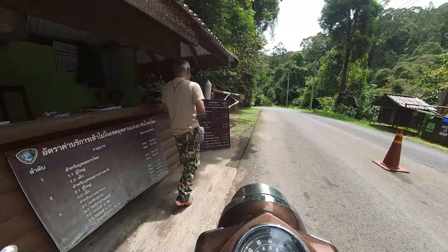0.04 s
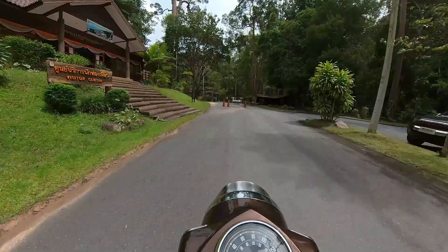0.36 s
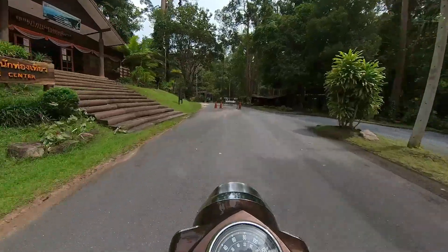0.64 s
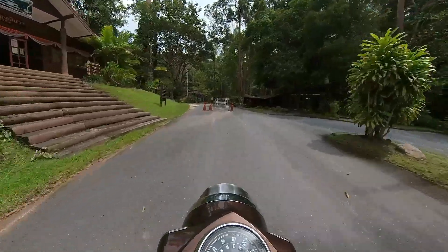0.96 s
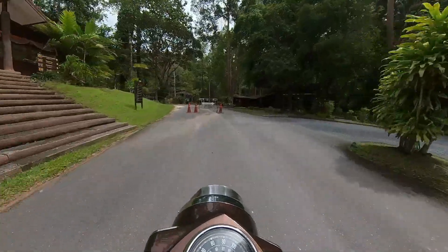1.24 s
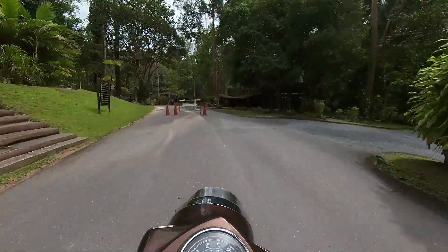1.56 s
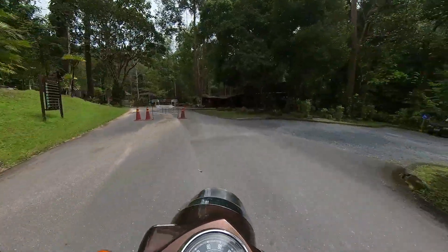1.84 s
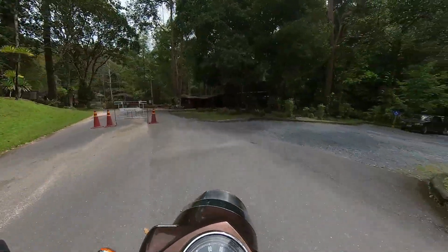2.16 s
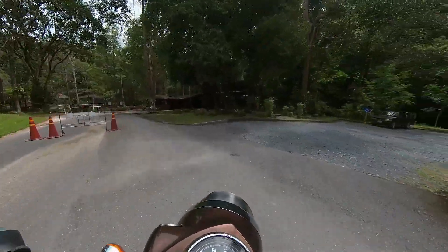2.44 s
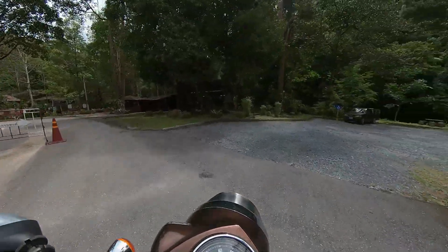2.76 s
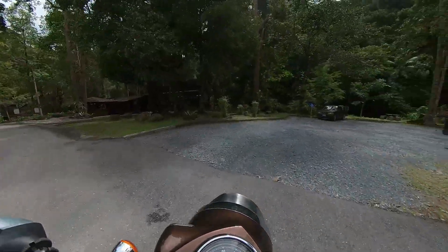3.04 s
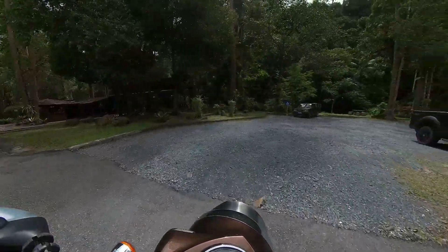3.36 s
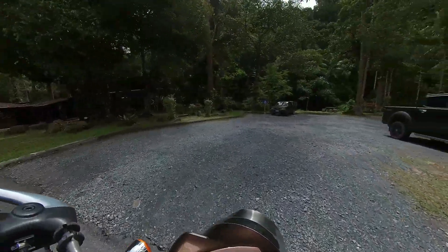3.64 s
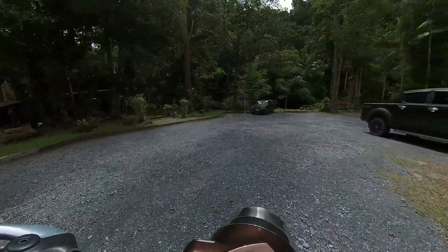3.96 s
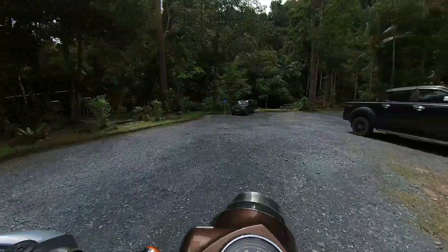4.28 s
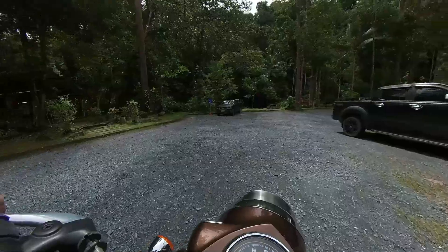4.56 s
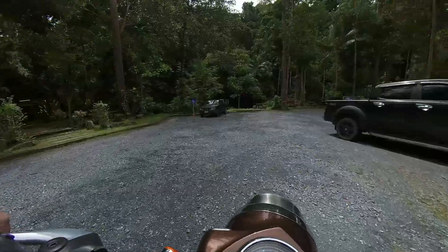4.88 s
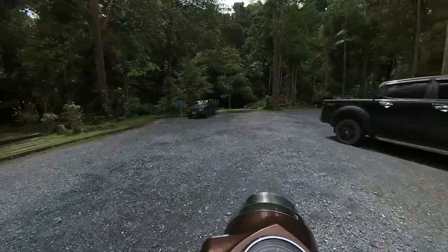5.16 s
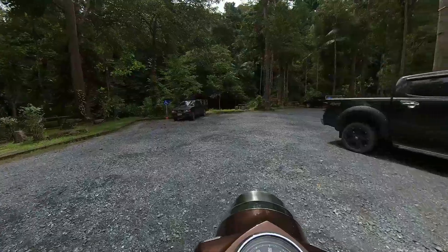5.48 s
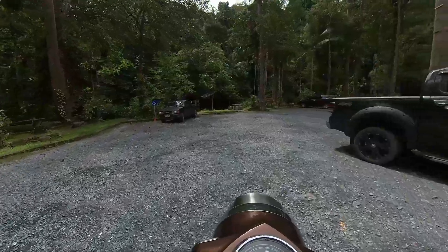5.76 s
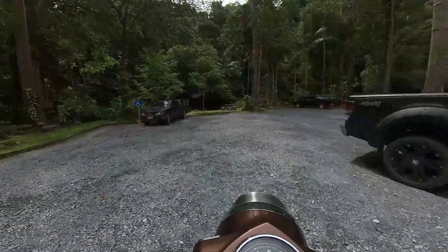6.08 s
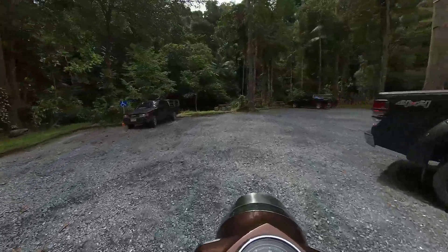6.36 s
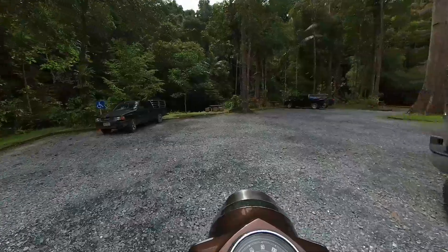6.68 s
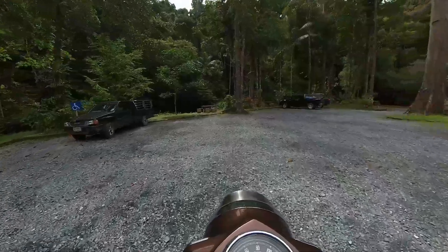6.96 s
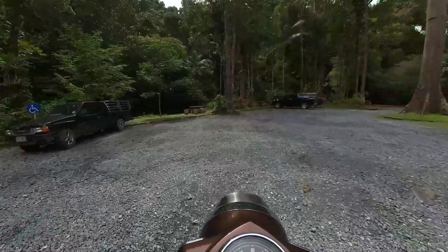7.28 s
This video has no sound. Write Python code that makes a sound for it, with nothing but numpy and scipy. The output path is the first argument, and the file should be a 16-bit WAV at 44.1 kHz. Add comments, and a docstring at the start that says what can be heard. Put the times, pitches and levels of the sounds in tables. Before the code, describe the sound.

A small single-cylinder scooter engine putters at idle for the whole seven seconds or so, heard close, from just above the handlebar outdoors. It beats about nine times a second with low, slightly uneven exhaust thumps, a booming hum and a light mechanical knock and rattle, never revving. A brief faint hiss ends in a sharp click at about 0.2 seconds. A loose cover pings softly on and off, mostly between 2 and 5 seconds. From about 3.5 seconds a very faint gravel crunch builds under the tyres. A quick cluster of stones clinks against metal and plastic bodywork just after 4 seconds, with lighter hits around 5.4, 6, 6.8 and 7.1 seconds. Light, low wind buffets the microphone, gusting a little more from 4 seconds on. A thin, high insect-like whine is barely audible behind the engine.

```python
"""On the saddle of a single-cylinder four-stroke scooter, rolling at idle from asphalt onto gravel.
Each firing thumps the muffler and barks from the tailpipe; the intake gulps, the valves knock,
the casing rattles and a loose cover pings in step. Light wind buffets the microphone, stones crunch
under the tyres and strike the bodywork, and a thin whine hangs in the trees."""
import sys
import numpy as np
from scipy import signal
from scipy.fft import rfft, irfft, next_fast_len
from scipy.io import wavfile
from scipy.ndimage import uniform_filter1d, map_coordinates

SR = 44100
rng = np.random.default_rng(int(sys.argv[2]) if len(sys.argv) > 2 else 0)


def output_pcm(signal):
    """Save a mono or channel-first signal as 16-bit PCM at the path in sys.argv[1].

    Samples are clipped to [-1, 1] before scaling.
    """
    pcm = np.clip(np.atleast_2d(signal).T, -1, 1) * 32767
    wavfile.write(sys.argv[1], SR, np.round(pcm).astype(np.int16))


N = 322812

# Resonances: freq_hz, width_hz, gain_db
MUFFLER_MODES = [(118, 12.4, -10), (161, 45, -10), (224.5, 21, 1), (252, 27, -11), (381, 16, -23)]
TAILPIPE_MODES = [(545, 46, -5.5), (934.4, 54, 2)]
AIRBOX_MODES = [(108, 7, -4), (128.8, 10, -1), (207, 48, -3.6), (236.6, 18, -.3)]
FRAME_MODES = [(133.5, 10, 0)]
HEAD_MODES = [(397, 38, 0), (464, 45, -8.5), (584, 27, -20)]
ROCKER_COVER_MODES = [(1472, 41, -4), (1622, 20, 1), (1693, 70, -4), (1820, 66, -12.5), (1983, 70, -9.5)]
CASING_MODES = [(287, 50, -10), (380.8, 11, 0.5), (413.1, 17, 1.5), (473, 39, -7), (551, 29, -13.5),
                (644, 8.8, -23), (841, 69, -18), (940, 18, -13), (1058, 18, -22.5)]
STEEL_MODES = [(1170, 89, 5), (1710, 32, 10), (2023, 61, 11), (2510, 47, 4), (3040, 140, -3),
               (3520, 83, -2), (3960, 71, -0.5), (4500, 380, -7), (4860, 90, -3.5), (5240, 230, -12),
               (7100, 250, -12.5)]
LOOSE_COVER_MODES = [(961, 27, 0)]
MUDGUARD_MODES = [(1100, 61, 11), (1800, 110, 1.5)]

# Spectral shapes: freq_hz, relative_db
BARK_SPECTRUM = [(250, -26), (420, 12.5), (600, 1.5), (720, -8.5), (850, 3.5), (930, 3.5), (1100, -11.5),
                 (1400, -33), (2000, -22), (3000, -49), (8000, -71.5)]
DRONE_SPECTRUM = [(40, -25), (70, -6), (95, -5.5), (110, -10.5), (150, -4.5), (178, -6), (197, -9),
                  (222, 3.5), (260, -2.5), (305, -18.5), (600, -27.5), (1500, -80), (4000, -110)]
CHAIN_SPECTRUM = [(300, 1.5), (1100, 20), (1900, -2), (2400, 4), (3000, 1.5), (4200, -0.5), (6200, -1),
                  (7300, -3), (8000, -7), (8600, -21.5), (10500, -28), (15000, -33.5)]
WIND_SPECTRUM = [(18, -30.5), (29, -12.5), (47, 0.5), (65, -14), (110, -14), (400, -42), (1500, -94.5),
                 (4000, -120)]
STONE_SPECTRUM = [(400, -32.5), (1100, 3.5), (1900, 4.5), (2700, -1.5), (4400, -11), (7000, -11.5),
                  (8300, -24.5), (10000, -58.5)]
TICK_SPECTRUM = [(1000, -36.5), (3000, -3), (5500, -3.5), (7500, 3.5), (10000, 3), (13000, -2),
                 (16000, -10.5)]
TAP_SPECTRUM = [(500, -9.5), (950, -1.5), (1500, -16), (4000, -28.5)]
CLICK_SPECTRUM = [(100, 0), (800, 17), (2500, 7), (7000, -2), (16000, -10)]
BRIGHT_HISS_SPECTRUM = [(500, 2), (3400, 2), (5000, -7), (8000, -4.5), (9000, -3), (10500, -10.5),
                        (12500, -5.5), (16000, -11.5)]

# Blows in each engine cycle: phase_cycles, relative_db, scatter_db
INTAKE_STROKES = [(.187, 0, 1.4), (.3834, -7.5, 2.5)]
VALVE_KNOCKS = [(.0256, 2.5, 1.5), (.0986, -1.5, 2), (.24, -1, 3), (.585, -2.5, 2), (.628, -3.5, 2),
                (.82, -2.5, 2), (.986, -2, 2)]
TAPPET_TICKS = [(.13, 0.5, 4), (.585, -6, 6), (.7, -4.5, 6), (.9, -1.5, 3.5)]
COVER_TAPS = [(.24, 0.5, 5), (.42, -4.5, 4.5), (.6, -4.5, 4), (.73, -1.5, 7)]
# Gains round the cycle: phase_cycles, casing_db, rocker_db, chain_db
CYCLE_GAINS = [(.03, 2, -2, -3.5), (.16, 0, 4, -3.5), (.23, -1.5, -0.5, -3.5), (.45, 2, 0, -2),
               (.555, -1.5, -3.5, -1.5), (.6, 0.5, 5, -3), (.7, 2, -1, -2.5), (0.851, -0.5, 0, 0),
               (.95, -0.5, -4.5, -0.5)]
# Hunting idle: time_s, firing_rate_hz
IDLE_RATE = [(0.13, 9.029), (0.39, 8.179), (0.66, 8.866), (1.18, 8.999), (1.67, 8.731), (2.14, 8.871),
             (2.5, 8.622), (2.94, 8.976), (3.49, 8.388), (3.75, 8.784), (4.38, 8.794), (4.54, 8.641),
             (5.3, 8.822), (5.65, 8.498), (6.23, 8.904), (6.96, 8.509), (7.1, 8.7)]
# Hard or stumbling firings, offsets from normal: time_s, thump_db, bark_db, slap_db, gulp_db
UNEVEN_FIRINGS = [(.076, -0.5, 3, 0.5, 2), (.187, -1.5, 1.5, 3, -10), (.265, 0, 2, 0.5, -2.5),
                  (.381, -0.5, 2, -2, -14), (.846, -0.5, -1.5, -3, 0.5), (1.07, 0, 6, 3.5, -0.5),
                  (1.18, 0.5, -5, 2.5, 3), (1.291, -0.5, 1, 3, -6.5), (1.404, 1, 4.5, -2, 3.5),
                  (1.631, 0.5, 2.5, 0.5, -0.5), (1.746, -0.5, -0.5, 2.5, 3.5), (1.975, 2, 0, 5, -0.5),
                  (2.088, 0.5, 3, 7, 0), (2.428, 1, 4.5, 1, -0.5), (2.543, 1, 3.5, 1.5, 0),
                  (2.772, -0.5, 4.5, -2, 0), (2.886, 0.5, 3, 4.5, 1.5), (3.109, 0, 3.5, 6, -7.5),
                  (3.224, 2, 2.5, -1, -11), (3.34, 0, 0.5, 6, 2.5), (3.459, 1.5, 3, 2, -7),
                  (3.577, 2.5, 4.5, 3.5, 0.5), (3.694, -1.5, 2, 2, -1), (3.809, 1.5, 4.5, -0.5, -3.5),
                  (4.149, 0, 1.5, 0, -7.5), (4.264, -1.5, -1, -0.5, 2.5), (4.49, -1, 4, 3, -15.5),
                  (4.722, -0.5, 2, 5, -0.5), (4.838, 0, 0.5, 3.5, 6), (5.064, 0, -2, 3, -2),
                  (5.407, -2, 1.5, 4, 0.5), (5.521, 1, 0, 2, 4), (5.871, -1, 3.5, 3, -15),
                  (6.101, 1.5, 2.5, 4.5, 0), (6.214, 1, 1, 6, 0), (6.44, -1.5, 3.5, 2.5, -2),
                  (6.669, -0.5, 2.5, 0.5, 3), (7.019, 0, 4.5, 1.5, 0.5), (7.249, 0.5, -0.5, 6.5, 1)]

# Envelopes: time_s, gain_db
WIND_ENVELOPE = [(0, -46.5), (.5, -41), (1.3, -46), (1.7, -41), (2.2, -42), (2.9, -41.5), (3.3, -37.5),
                 (3.8, -42.5), (4.1, -37), (4.27, -30.5), (4.45, -35.5), (4.6, -31.5), (5.2, -40),
                 (5.5, -29.5), (5.8, -32), (6.3, -36), (6.9, -33), (7.1, -39), (7.3, -28)]
BRIGHT_HISS_ENVELOPE = [(0, -61), (.12, -69), (.145, -61.5), (.194, -65), (.2, -110)]
PING_ENVELOPE = [(0, -61), (.85, -62), (1.5, -56.5), (2.25, -52), (3.05, -52.5), (4.5, -51), (4.95, -51),
                 (7.3, -61.5)]
BOOM_ENVELOPE = [(0, -34.5), (.5, -32), (1.25, -33), (2.9, -42.5), (4, -37.5), (4.55, -37), (5.15, -42),
                 (5.65, -34), (6.2, -41.5), (6.6, -32), (7.3, -41)]
# Whine creeping upward: time_s, pitch_hz
WHINE_PITCH = [(.2, 6270), (2.5, 6420), (4.7, 6420), (7.3, 6450)]
# Light, bright ticks: start_s, level_db, t60_s
LIGHT_TICKS = [(.131, -43.5, 0.021), (.139, -52, 0.03), (.632, -58.5, 0.021), (3.958, -62, 0.0092),
               (6.565, -57, 0.017), (6.598, -57, .03), (6.655, -65, 0.022)]
# Thrown stones on the bodywork: start_s, steel_drive_db, plastic_drive_db, t60_s
STONE_HITS = [(4.004, -52, -54, 0.06), (4.01, -51.5, -42, 0.026), (4.038, -55, -61, .04),
              (4.097, -46.5, -50, 0.048), (4.112, -46, -52, 0.042), (4.127, -51.5, -42, 0.072),
              (4.209, -54.5, -62, .04), (5.412, -54, -53.5, 0.046), (5.438, -53, -54, .03),
              (5.912, -60, -49, .02), (6.071, -59, -62, .04), (6.838, -54.5, -64, 0.029),
              (7.15, -55, -55.5, 0.026)]
# Jolts to the loose cover: start_s, relative_db
COVER_JOLTS = [(0.424, -4.5), (.451, -2), (0.496, -10.5), (1.359, 0), (2.108, -4), (2.276, 0),
               (2.394, -2.5), (2.566, -3), (3.073, -1), (3.257, 1), (3.651, -0.5), (4.119, -1),
               (4.188, -1.5), (4.78, -1.5), (5.011, -3.5), (5.139, -1.5), (5.201, -0.5), (6.407, -0.5)]

FIRST_FIRING_S = .076
CLICK_S, SKIP_CYCLES = .1962, .346  # the beat jumps ahead at the click


def amp(db):
    """Decibels to gain."""
    return 10 ** (np.asarray(db) / 20)


def unit(x):
    """Scale to rms 1."""
    return x / np.sqrt(np.mean(x ** 2) + 1e-20)


def steady(x, span_s):
    """Hold rms at 1 over span_s; fast flutter remains."""
    return x / np.sqrt(abs(uniform_filter1d(x ** 2, int(span_s * SR))) + 1e-20)


def clock():
    """Sample times in s."""
    return np.arange(N) / SR


def curve(rows):
    """Linear interpolation of (time_s, value) rows."""
    return np.interp(clock(), *np.transpose(rows))


def wobble(rate_hz):
    """Random knots at rate_hz, joined by lines."""
    knots = rng.standard_normal(int(N * rate_hz / SR) + 4)
    return map_coordinates(knots, [clock() * rate_hz], order=1)


def filtered(x, response):
    """Apply a complex frequency response."""
    size = 2 * next_fast_len((N + SR // 2) // 2)
    return irfft(rfft(x, size) * response(np.fft.rfftfreq(size, 1 / SR)), size)[:N]


def dulled(x, cutoff_hz=8200):
    """Steep low-pass."""
    return filtered(x, lambda hz: 1 / (1 + (hz / cutoff_hz) ** 20))


def coloured(x, spectrum):
    """Minimum-phase filter of unit power, shaped to the spectrum."""
    def response(hz):
        knot_hz, db = np.transpose(spectrum)
        magnitude = unit(amp(np.interp(np.log(hz + 1), np.log(knot_hz), db)))
        cepstrum = irfft(np.log(magnitude))
        cepstrum[1:len(hz) - 1] *= 2
        cepstrum[len(hz):] = 0
        return np.exp(rfft(cepstrum))
    return filtered(x, response)


def ringing(x, modes, drive_hz, alternate=True):
    """Resonator bank driven best near drive_hz; neighbouring modes may alternate in sign."""
    sign = -1 if alternate else 1

    def response(hz):
        bank = sum(sign ** k * amp(db) * mode_hz * width_hz / (mode_hz**2 - hz**2 + 1j * hz * width_hz)
                   for k, (mode_hz, width_hz, db) in enumerate(modes))
        return bank * (1j * hz / drive_hz) / (1 + 1j * hz / drive_hz) ** 2
    return filtered(x, response)


def noise(spectrum):
    """Coloured noise, rms 1."""
    return unit(coloured(rng.standard_normal(N), spectrum))


def impulses(times_s, sizes):
    """One-sample blows."""
    inside = (times_s >= 0) & (times_s < (N - 1) / SR)
    return np.bincount(np.round(times_s[inside] * SR).astype(int), sizes[inside], N)


def scraped(blows, decay_s):
    """Turn each blow into a decaying puff of noise."""
    decay = np.exp(-np.arange(SR // 15) / SR / decay_s)
    return signal.fftconvolve(blows, decay)[:N] * rng.standard_normal(N)


def bursts(rows):
    """Grainy bursts from (start_s, level_db, t60_s) rows."""
    t = clock()
    level = sum((t >= start_s) * amp(db - 60 * np.clip((t - start_s) / t60_s, 0, 2))
                for start_s, db, t60_s in rows)
    return level * rng.laplace(size=N) / np.sqrt(2)


def cycle_starts():
    """Engine cycle starts in s, with a spare at each end."""
    t = clock()
    cycles = np.cumsum(curve(IDLE_RATE)) / SR + SKIP_CYCLES * (t > CLICK_S)
    cycles -= np.interp(FIRST_FIRING_S, t, cycles)
    firing_s = np.interp(np.arange(np.ceil(cycles[-1])), cycles, t)
    return np.pad(firing_s, 1, mode="reflect", reflect_type="odd")


def firings():
    """Every firing: time_s, then thump, bark, slap and gulp offsets in dB."""
    firing_s = cycle_starts()[1:-1]
    uneven_s, *offsets_db = np.transpose(UNEVEN_FIRINGS)
    nearest = abs(firing_s[:, None] - uneven_s).argmin(axis=0)
    return firing_s, *(np.bincount(nearest, db, len(firing_s)) for db in offsets_db)


def cam_blows(rows, jitter_s):
    """Blows at set phases of each cycle, scattered in time and size."""
    starts_s = cycle_starts()
    phase, db, scatter_db = np.transpose(rows)
    late, size = rng.standard_normal((2, len(starts_s) - 1, len(rows)))
    times_s = starts_s[:-1, None] + np.diff(starts_s)[:, None] * phase + jitter_s * late
    return impulses(times_s.ravel(), amp(db + scatter_db * np.tanh(size)).ravel())


def insects(level_db=-84.5, width_hz=140):
    """Thin narrow-band whine, probably insects in the trees."""
    phase_rad = 2 * np.pi * np.cumsum(curve(WHINE_PITCH)) / SR
    band = wobble(width_hz) * np.cos(phase_rad) + wobble(width_hz) * np.sin(phase_rad)
    return amp(level_db) * unit(band)


def wind(gust_db=2.5, gust_rate_hz=7.5):
    """Low buffeting that surges over the rough, open gravel."""
    level_db = curve(WIND_ENVELOPE) + gust_db * np.tanh(wobble(gust_rate_hz))
    return amp(level_db) * steady(noise(WIND_SPECTRUM), span_s=.24)


def ticks_and_click():
    """A brief bright hiss ends in a sharp click; light ticks are duller after it."""
    click = coloured(impulses(np.array([CLICK_S]), amp([-13.5])), CLICK_SPECTRUM)
    ticks = coloured(bursts(LIGHT_TICKS), TICK_SPECTRUM)
    ticks = np.where(clock() < CLICK_S, ticks, dulled(ticks))
    hiss = amp(curve(BRIGHT_HISS_ENVELOPE)) * noise(BRIGHT_HISS_SPECTRUM)
    return ticks + click + hiss


def gravel(start_s=3.4, rise_s=.4, growth_db_per_s=2.5):
    """Tyres sink into ever looser stones: a dense crunch of faint cracks."""
    when, size = rng.random((1100, 2)).T
    cracks = scraped(impulses(when * N / SR, amp(14 * size ** 2)), decay_s=.0018)
    since_s = clock() - start_s
    level = np.clip(since_s / rise_s, 0, 1) * amp(-78 + growth_db_per_s * since_s)
    return level * unit(coloured(cracks, STONE_SPECTRUM))


def thrown_stones():
    """Stones off the tyres ring steel parts and knock the plastic mudguard."""
    steel_hits = bursts([(start_s, db, t60_s) for start_s, db, _, t60_s in STONE_HITS])
    plastic_hits = bursts([(start_s, db, t60_s) for start_s, _, db, t60_s in STONE_HITS])
    steel = amp(15) * ringing(steel_hits, STEEL_MODES, drive_hz=2450)
    mudguard = amp(20.5) * ringing(plastic_hits, MUDGUARD_MODES, drive_hz=1700)
    return dulled(steel + mudguard + amp(-7.5) * steel_hits)


def loose_cover():
    """A loose cover pings softly between firings, harder when jolted."""
    def ring(taps):
        return ringing(coloured(taps, TAP_SPECTRUM), LOOSE_COVER_MODES, drive_hz=950)
    pings = amp(curve(PING_ENVELOPE)) * unit(ring(cam_blows(COVER_TAPS, jitter_s=.001)))
    jolt_s, jolt_db = np.transpose(COVER_JOLTS)
    return pings + ring(impulses(jolt_s, amp(jolt_db + 4)))


def gears_and_chain():
    """Gears rattle the casing and rocker cover; the chain hisses as its load cycles."""
    starts_s = cycle_starts()
    cycles = np.interp(clock(), starts_s, np.arange(len(starts_s)))
    phase, casing_db, rocker_db, chain_db = np.transpose(CYCLE_GAINS)

    def load(db, flutter_db, flutter_hz):
        return amp(np.interp(cycles, phase, db, period=1) + flutter_db * wobble(flutter_hz))

    def rattle(db, modes, drive_hz):
        chatter = load(db, flutter_db=3, flutter_hz=150) * rng.standard_normal(N)
        return ringing(chatter, modes, drive_hz, alternate=False)
    casing = steady(rattle(casing_db, CASING_MODES, drive_hz=390), span_s=.31)
    rocker = steady(rattle(rocker_db, ROCKER_COVER_MODES, drive_hz=1500), span_s=.27)
    chain = unit(load(chain_db, flutter_db=2.8, flutter_hz=120) * noise(CHAIN_SPECTRUM))
    return dulled(amp(-35.5) * casing + amp(-61) * rocker) + amp(-64.5) * chain


def valve_train():
    """Combustion and valves knock the cylinder head; tappets tick on thin steel."""
    blows = cam_blows(VALVE_KNOCKS, jitter_s=.00018)
    knocks = unit(ringing(blows, HEAD_MODES, drive_hz=400, alternate=False))
    taps = scraped(cam_blows(TAPPET_TICKS, jitter_s=.00058), decay_s=.0065)
    ticks = unit(ringing(taps, STEEL_MODES, drive_hz=3200))
    return dulled(amp(-37) * knocks + amp(-74.5) * ticks)


def piston(level_db=-73.5, delay_s=.0023):
    """The piston slaps the cylinder just after each firing: a sharp steel tick."""
    firing_s, _, _, slap_db, _ = firings()
    slaps = scraped(impulses(firing_s + delay_s, amp(slap_db)), decay_s=.0062)
    steel = ringing(slaps, STEEL_MODES, drive_hz=3000)
    return dulled(amp(level_db) * unit(steel + .019 * slaps))


def frame():
    """The frame booms at its resonance over a low drone."""
    boom = steady(ringing(rng.standard_normal(N), FRAME_MODES, drive_hz=95), span_s=.42)
    return amp(curve(BOOM_ENVELOPE)) * boom + amp(-33.5) * noise(DRONE_SPECTRUM)


def intake(level_db=-33):
    """The air box gulps twice a cycle as the intake opens and shuts."""
    strokes = cam_blows(INTAKE_STROKES, jitter_s=.0003)
    firing_s, _, _, _, gulp_db = firings()
    depth = amp(gulp_db)[np.searchsorted(firing_s, clock()) - 1]
    return amp(level_db) * unit(ringing(depth * strokes, AIRBOX_MODES, drive_hz=154))


def exhaust(bark_lead_s=.00081, rise_s=.015, decay_s=.0086, pipe_jitter_s=.00022):
    """Each puff thumps the muffler, rings the tailpipe and exits with a turbulent bark."""
    firing_s, thump_db, bark_db, _, _ = firings()
    thump_scatter, bark_scatter, late = rng.standard_normal((len(firing_s), 3)).T
    puffs = impulses(firing_s, amp(thump_db + 1.02 * thump_scatter))
    thump = unit(ringing(puffs, MUFFLER_MODES, drive_hz=310))
    t = np.arange(SR // 10) / SR
    puff_shape = (1 - np.exp(-t / rise_s)) * np.exp(-t / decay_s)
    force = amp(bark_db + .3 * np.tanh(bark_scatter))
    flow = signal.fftconvolve(impulses(firing_s - bark_lead_s, force), puff_shape)[:N]
    bark = unit(coloured(flow * rng.standard_normal(N), BARK_SPECTRUM))
    pipe_blows = impulses(firing_s + pipe_jitter_s * late, force)
    pipe = unit(coloured(ringing(pipe_blows, TAILPIPE_MODES, drive_hz=297), BARK_SPECTRUM))
    return amp(-27.5) * thump + amp(-47.5) * bark + amp(-48.5) * pipe


def scene():
    """Mono mix, just above the handlebar."""
    engine = exhaust() + piston() + intake() + valve_train() + gears_and_chain()
    body = frame() + loose_cover() + thrown_stones()
    background = gravel() + wind() + insects() + ticks_and_click()
    return (engine + body + background)[None]


def record(dry, fade_s=.003, cutoff_hz=15750):
    """Fade both ends and band-limit."""
    fade = np.clip(np.minimum(clock(), clock()[::-1]) / fade_s, 0, 1)
    return np.array([filtered(x * fade, lambda hz: hz < cutoff_hz) for x in dry])


dry = scene()
out = record(dry)
output_pcm(out)
```